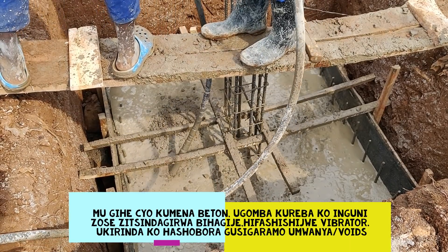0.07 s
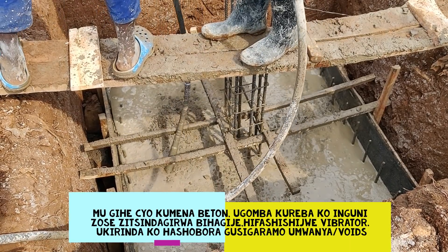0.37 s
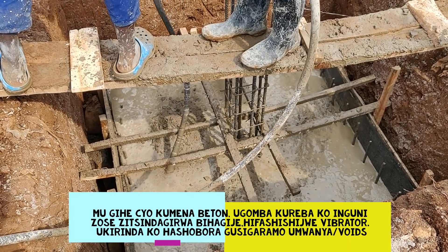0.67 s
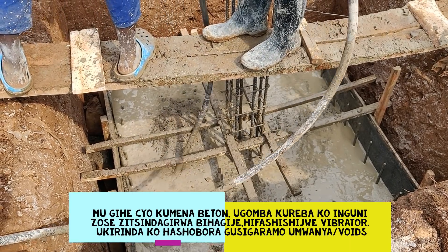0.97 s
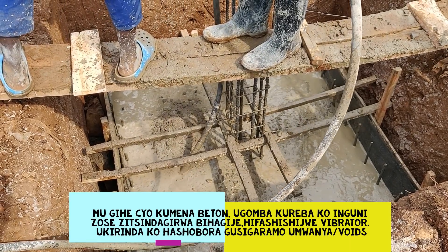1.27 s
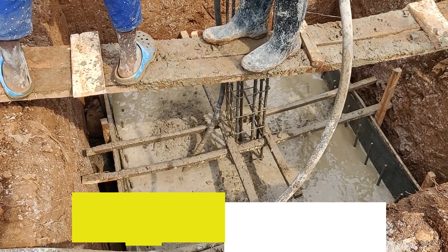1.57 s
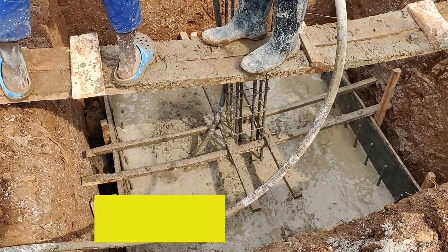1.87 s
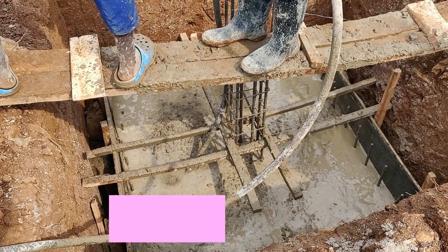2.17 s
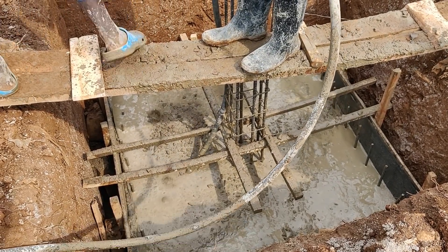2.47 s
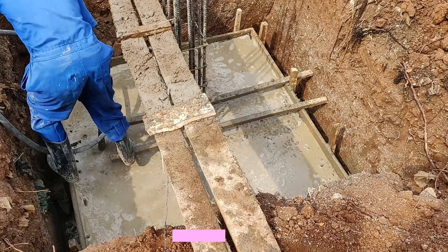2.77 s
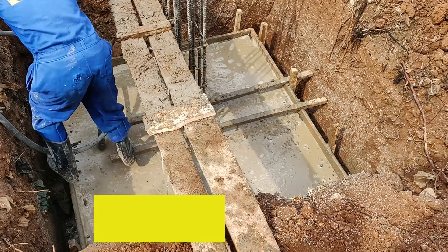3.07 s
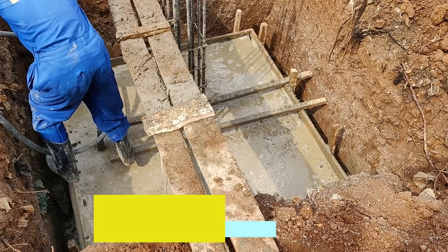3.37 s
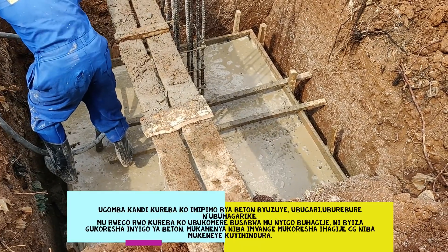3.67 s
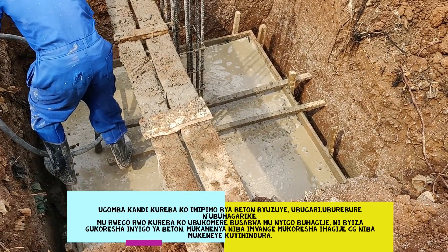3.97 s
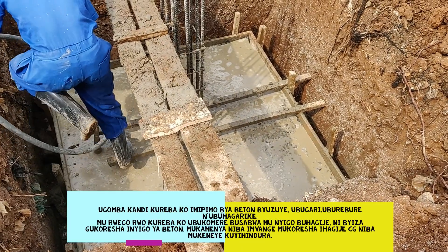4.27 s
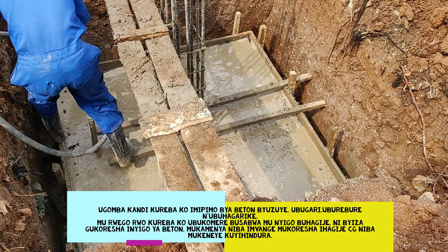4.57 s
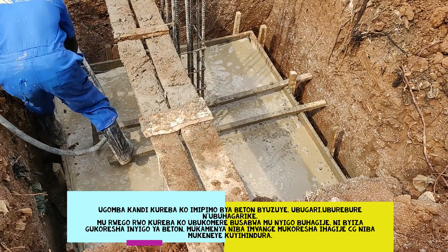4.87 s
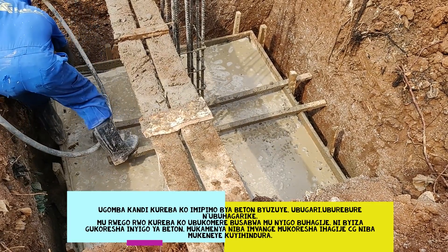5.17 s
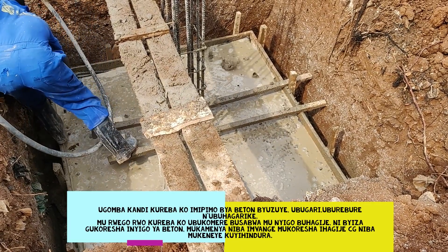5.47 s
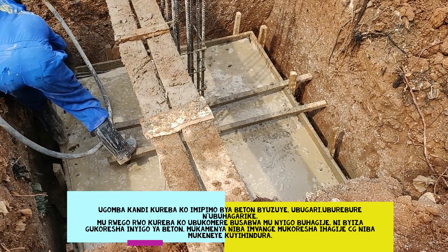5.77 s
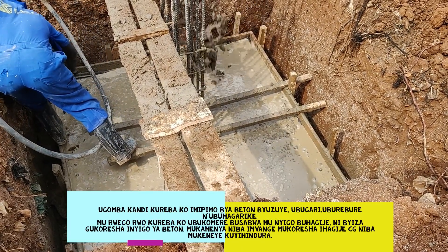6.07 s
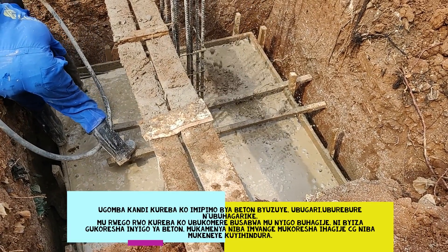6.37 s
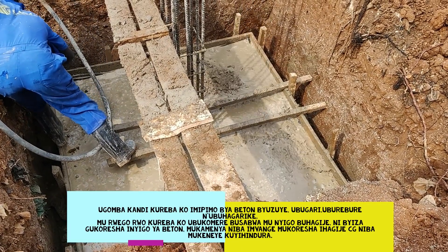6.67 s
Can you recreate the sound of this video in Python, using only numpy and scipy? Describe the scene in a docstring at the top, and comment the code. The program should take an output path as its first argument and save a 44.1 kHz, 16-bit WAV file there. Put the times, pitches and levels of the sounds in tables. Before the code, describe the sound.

A petrol-driven poker vibrator shakes wet concrete at an outdoor building site. Its hum pulses unevenly, with a shrill metallic rattle on top and a small engine throbbing behind. The sound dips for an instant and returns from another spot, where gusts of wind rumble on the microphone. Near the end a lump of concrete plops into the mix and spatters while the machine keeps running.

```python
"""A petrol-driven poker vibrator shakes the wet concrete of a footing, heard from two spots in turn.
From the start it hums, beating against a slightly slower second poker. Its pendulum rattles round the
casing, the small engine throbs behind it, and wet grit sprays now and then.
At 2.65 s the sound dips briefly and returns at the second spot, where wind ruffles the microphone.
Near 6 s a lump of concrete plops into the mix and spatters."""
import sys
import numpy as np
from scipy import signal
from scipy.fft import rfft, irfft
from scipy.io import wavfile

SR = 44100
rng = np.random.default_rng(int(sys.argv[2]) if len(sys.argv) > 2 else 0)


def unload_audio(sound):
    """Save the sound as a 16-bit wav file, at the path given as the first command line argument."""
    columns = np.transpose(np.atleast_2d(sound))
    # keep every value between -1 and 1, then stretch to whole-number steps
    steps = np.round(np.clip(columns, -1, 1) * 32767)
    wavfile.write(sys.argv[1], SR, steps.astype(np.int16))


N = 296352
T = np.arange(N) / SR
HZ = np.fft.rfftfreq(N, 1 / SR)


def amp(db):
    """Turns decibels into a number to multiply by."""
    return 10 ** (np.asarray(db) / 20)


def unit(x):
    """Scales a signal so its average power is 1."""
    return x / np.sqrt(np.mean(x ** 2) + 1e-20)


def curves(rows):
    """Joins the points of a time table: one curve per value column."""
    times, *columns = np.transpose(rows)
    return np.array([np.interp(T, times, c) for c in columns])


def spectra(rows):
    """Joins the points of a pitch table: one curve per value column."""
    hz, *columns = np.transpose(rows)
    return np.array([np.interp(np.log(HZ + 1), np.log(hz + 1), c) for c in columns])


def drift(per_s):
    """A random wobble, with up to about per_s changes a second."""
    return unit(irfft(rfft(rng.standard_normal(N)) * np.exp(-(HZ / per_s) ** 2), N))


def hump(middle_s, length_s):
    """A smooth swell up to 1 and back down."""
    return np.exp(-(2 * (T - middle_s) / length_s) ** 2)


def tone(turns):
    """A pure tone, one wave per turn, starting anywhere in its wave."""
    return np.sqrt(2) * np.sin(2 * np.pi * (turns + rng.random()))


# How alike left and right sound, from 0 to 1: pitch_hz, first_spot_likeness, second_spot_likeness
MIC_LIKENESS = [(100, 0, 0.39), (296, 0.38, 0.4), (550, .6, 0.41), (750, 0.57, 0.51), (1206, 0.68, 0.87),
                (2120, 0.73, 0.34), (2740, 0.3, 0.21), (5500, 0.37, 0.18), (7000, 0.18, 0.22),
                (9500, 0, .1)]
# How far the right side lags, its path being longer: pitch_hz, first_spot_radians, second_spot_radians
RIGHT_LAG = [(260, 0, 0), (700, 2, 1.2), (1000, 2.6, 1.5), (1280, 3.3, 3), (2000, 6, 4), (2700, 8.5, 9.6),
             (3500, 9.8, 10), (4600, 13.7, 16), (5600, 14.1, 16.5), (6300, 12, 19.3), (9000, 14, 24)]
def stereo_noise(spot, gain):
    """Noise as the microphone's two sides hear it. Spot 0 is the first spot, 1 the second."""
    left, other = rfft(rng.standard_normal((2, N))) * np.sqrt(SR / 2)
    same = np.clip(spectra(MIC_LIKENESS)[spot], 0, 1)
    right = (same * left + np.sqrt(1 - same ** 2) * other) * np.exp(-1j * spectra(RIGHT_LAG)[spot])
    return irfft(np.array([left, right]) * gain, N)


# Gusts on the microphone: middle_s, length_s, left_db, right_db
GUSTS = [(2.77, 0.082, -13.5, -21), (3.034, 0.36, -18, -26), (3.227, .16, -27, -23),
         (3.38, 0.089, -18, -31), (3.721, 0.3, -18.5, -22), (3.995, 0.31, -20, -17),
         (4.29, 0.19, -19, -16.5), (4.555, 0.31, -22, -16.5), (4.721, 0.11, -16.5, -18),
         (4.863, .13, -19, -16.5), (5.06, 0.097, -21, -24), (5.615, 0.069, -19.5, -33),
         (5.75, 0.11, -22, -31), (6.2, 0.21, -25, -35), (6.547, 0.19, -22.5, -31), (6.693, 0.088, -26, -32)]
# The wind's deep rumble: pitch_hz, relative_db
RUMBLE_COLOUR = [(8, -13), (20, 2), (38, 1.5), (70, -4.5), (130, -10.5), (250, -22), (450, -25.5),
                 (1000, -70)]
# The higher flutter of strong gusts: pitch_hz, relative_db
FLUTTER_COLOUR = [(80, 6.5), (240, 3.5), (400, -5), (600, -11.5), (1200, -56)]
# Single thumps of air: middle_s, pitch_hz, relative_db, length_s
AIR_THUMPS = [(2.71, 85, -15, .055), (2.785, 95, -21, .035)]
def wind(breeze_db=(-33, -28), lump_db=0.3, flutter_db=2, flutter_growth=1.4):
    """Gusts rumble on each side of the microphone; as they swell, flutter grows faster than rumble."""
    power = amp(breeze_db)[:, None] ** 2
    power = power + sum(amp(db)[:, None] ** 2 * hump(s, length) for s, length, *db in GUSTS)
    level_db = 10 * np.log10(power)
    rumble, flutter = (unit(irfft(rfft(rng.standard_normal((2, N))) * amp(spectra(colour)), N))
                       for colour in (RUMBLE_COLOUR, FLUTTER_COLOUR))
    lumps = unit(amp(lump_db * np.array([drift(10.5), drift(25)])))
    out = lumps * (rumble * amp(level_db) + flutter * amp(flutter_db + flutter_growth * level_db))
    mostly_left = np.array([[2], [.5]])
    for s, hz, db, length in AIR_THUMPS:
        out += amp(db) * hump(s, length) * np.sin(2 * np.pi * hz * (T - s)) * mostly_left
    return out


# Sprays of wet grit: start_s, level_db, length_s
SPRAYS = [(0.22, -26, .05), (1.668, -30, 0.052), (1.972, -24, 0.021), (4.202, -23, 0.0076),
          (5.34, -34, 0.065), (5.648, -36, 0.015), (5.944, -19, 0.013), (5.959, -23.5, 0.05),
          (6.001, -26, 0.068), (6.062, -30.5, .06), (6.166, -28, 0.034), (6.19, -20, 0.01),
          (6.4, -32.5, 0.14)]
# How bright the sprays sound: pitch_hz, left_relative_db, right_relative_db
SPRAY_COLOUR = [(506, -13, -29), (1500, -3, -11), (3000, -5, -3.5), (6140, 4.5, -4), (8750, -20, 3.5),
                (10200, -47, -11), (15500, -20, -13)]
def spatter(drops_per_s=7000, spread_db=-2.5, rise_s=0.0013):
    """Each spray of grit is a dying shower of tiny clicks, some big and some small."""
    shower = np.zeros(N)
    for s, db, length in SPRAYS:
        age = np.maximum(T - s, 0)
        shower += amp(db) * (1 - np.exp(-age / rise_s)) * np.exp(-np.minimum(age / length, 6) ** 2)
    sizes = amp(spread_db * np.minimum(rng.exponential(1, N), 3))
    lands = rng.random(N) < drops_per_s / SR
    clicks = unit(sizes * lands * rng.standard_normal((2, N)))
    return irfft(rfft(clicks * shower) * unit(amp(spectra(SPRAY_COLOUR))), N)


# Air pockets popping: start_s, pitch_hz, level_db, fade_s (time to fall by 60 dB)
AIR_POCKETS = [(5.9451, 1194, -10.5, 0.033), (5.946, 1030, -16, 0.026), (5.9465, 725, -7, 0.022),
               (5.945, 2200, -17, 0.022), (5.946, 4000, -19.5, 0.013), (5.945, 86, -14.5, 0.13)]
def plop(rise_s=0.00042, right_delay_s=0.00016):
    """A lump lands and air pockets pop in quick turn, each ringing as a short, dying tone."""
    out = np.zeros((2, N))
    samples = SR // 8
    age = np.maximum(np.arange(samples) / SR - np.array([[0], [right_delay_s]]), 0)
    for s, hz, db, fade_s in AIR_POCKETS:
        start = round(s * SR)
        loudness = amp(db) * 1000 ** (-age / fade_s) * (1 - np.exp(-age / rise_s))
        out[:, start:start + samples] += loudness * np.sin(2 * np.pi * hz * age)
    return out


# The engine's tones: multiple_of_firing_rate, first_spot_db, second_spot_db
ENGINE_TONES = [(1, -44, -49), (2, -30, -37), (3, -39, -43), (4, -40, -40), (5, -33, -35), (6, -33, -35),
                (7, -55, -51), (8, -35, -44), (9, -40, -58), (10, -39, -49), (11, -35.5, -54),
                (13, -43, -65), (16, -43.5, -50)]
# Roar of exhaust and casing, before its top is cut: pitch_hz, first_spot_db_per_hz, second_spot_db_per_hz
ENGINE_ROAR = [(30, -57, -57), (110, -59, -54), (200, -56, -53), (330, -54, -59), (470, -54.5, -60),
               (640, -57, -60), (770, -57, -58.5), (880, -60, -62.5), (1150, -61, -60.5),
               (1350, -60.5, -59.5), (1550, -60, -65), (1800, -63, -65), (2200, -63, -69), (3000, -66, -71)]
def engine(spot, firings, unevenness=0.15, throb_db=0.5, flicker_db=0.5, cutoff_hz=3000):
    """The engine's firings blend into low tones, and its roar swells with each one."""
    tones = sum(amp(db[spot]) * tone(round(multiple) * firings) * (1 + unevenness * drift(6.9))
                for multiple, *db in ENGINE_TONES)
    roar = stereo_noise(spot, amp(spectra(ENGINE_ROAR)[spot]) / (1 + (HZ / cutoff_hz) ** 12))
    swell_db = throb_db * (tone(firings) + 0.26 * tone(2 * firings)) + flicker_db * drift(21)
    return tones + roar * unit(amp(swell_db))


# Narrow ringing bands: pitch_hz, width_hz, first_spot_db, second_spot_db
RINGING_BANDS = [(460, 10, -41, -47), (770, 50, -43, -44), (997, 10, -45, -45), (1120, 50, -50, -43),
                 (1305, 50, -58, -42), (1385, 40, -45, -44), (9400, 70, -62, -48), (15490, 110, -72, -58)]
def rings(spot):
    """Narrow ringing bands of noise, plus a faint, very high whistle."""
    power = sum(amp(db[spot]) ** 2 * np.exp(-np.pi * ((HZ - hz) / width) ** 2) / width
                for hz, width, *db in RINGING_BANDS)
    return stereo_noise(spot, np.sqrt(power))


# The hose's shrill ring, one list per spot: time_s, pitch_hz, level_db
SHRILL_GLIDE = ([(0, 5800, -36), (.5, 5740, -27.5), (1.2, 5320, -31.5), (2.6, 5180, -32.5)],
                [(2.7, 5570, -45), (3.4, 5370, -32), (4.55, 5620, -33), (5.25, 5400, -49), (5.6, 5270, -33),
                (6.1, 5280, -30.5), (6.7, 5400, -46)])
def shrill_ring(spot, width_hz=240, right_db=-8.0):
    """A narrow band of grinding noise from the hose slides in pitch as the poker is moved."""
    hz, level_db = curves(SHRILL_GLIDE[spot])
    angle = 2 * np.pi * np.cumsum(hz) / SR
    sides = [drift(width_hz) * np.cos(angle) + drift(width_hz) * np.sin(angle) for _ in range(2)]
    return np.array(sides) * amp(level_db) * amp([[0], [right_db]])


# The colour of the rattle's hiss at a reference level, one list per spot:
# pitch_hz, left_db_per_hz, right_db_per_hz
RATTLE_COLOUR = ([(1950, -77, -79), (2880, -64, -67), (3730, -61, -62.5), (4630, -60, -59),
                 (5320, -55, -56), (5950, -52.5, -68), (6130, -57, -51), (6310, -51, -63.5),
                 (7080, -62, -62.5), (8600, -73, -58.5), (9250, -79, -62), (10100, -77, -76.5),
                 (10100, -100, -87.5), (15000, -83, -77.5)], [(2000, -78, -105), (2970, -64, -66.5),
                 (3530, -60.5, -63), (4120, -61.5, -62), (5200, -53, -57.5), (5800, -51, -51),
                 (5700, -50.5, -62.5), (6410, -50.5, -66), (7170, -61.5, -58.5), (8530, -81, -58),
                 (9750, -104, -64.5), (10000, -102, -78.5), (15500, -102, -78.5)])
# How strong that hiss is, one list per spot: time_s, level_db (counted against reference_db)
RATTLE_STRENGTH = ([(0, -22.5), (.7, -26), (.82, -24.5), (1.45, -26), (2.4, -25.5), (2.6, -27)],
                   [(2.7, -37.5), (3.5, -37), (4.8, -36), (5.2, -37.5), (5.6, -37), (6.7, -36.5)])
# The head scrapes on steel and the hiss swells: middle_s, rise_db, length_s
SCRAPES = [(3.415, 7.5, 0.019), (4.54, 3, 0.12)]
def rattle(spot, whirls, shaft_turns, roll_db=0.26, shaft_db=0.4, whirl_db=0.4, grit_db=0.9,
           flicker_db=0.6, roll_hum_db=(-35, -42), reference_db=(-23.3, -29.0)):
    """The pendulum hums and grinds round its track, once per whirl plus once per shaft turn."""
    level_db = curves(RATTLE_STRENGTH[spot])[0] + sum(db * hump(s, length) for s, db, length in SCRAPES)
    roll = tone(whirls + shaft_turns)
    contact_db = roll_db * roll + shaft_db * tone(shaft_turns)
    contact_db += whirl_db * (tone(whirls) + tone(2 * whirls))
    contact_db += grit_db * drift(700) + flicker_db * drift(22)
    hiss = stereo_noise(spot, amp(spectra(RATTLE_COLOUR[spot]))) * amp(level_db - reference_db[spot])
    grinding = (hiss + shrill_ring(spot)) * unit(amp(contact_db))
    return grinding + amp(roll_hum_db[spot]) * roll


# Beats, the dips in the hum: middle_s, depth_db, slip_length_s
BEATS = [(0.048, -6, 0.034), (0.164, -3.5, 0.094), (0.39, -10, 0.044), (0.575, -16, 0.062),
         (0.786, -10, 0.043), (1.084, -9.5, .2), (1.37, -5, 0.13), (1.67, -7.5, 0.14), (1.95, -8, 0.16),
         (2.231, -3, 0.098), (2.74, -13, 0.17), (3.028, -12, 0.17), (3.307, -19, 0.074),
         (3.533, -23, 0.097), (3.88, -12.5, 0.14), (4.296, -3.5, 0.1), (4.502, -2.5, .08)]
def beating():
    """The pokers pull each other into step; then the slower one slips a turn and the hums partly cancel."""
    times, depth_db, _ = np.transpose(BEATS)
    lag_turns = sum(np.arctan(np.sinh(np.clip(2 * (T - s) / length, -20, 20))) / np.pi + .5
                    for s, _, length in BEATS)  # one smooth step per beat
    slower_share = np.interp(T, times, np.clip((1 - amp(depth_db)) / 2, 0, .5))
    return 1 - slower_share + slower_share * np.exp(-2j * np.pi * lag_turns)


# How hard the pokers shake the mix when in step, one list per spot: time_s, level_db
HUM_LEVEL = ([(0, -11.5), (.5, -9.5), (.85, -9), (1.8, -11), (2.15, -12), (2.6, -12)], [(2.7, -16),
             (3.45, -12), (4.05, -14.5), (4.35, -18.5), (5.2, -13), (6.7, -13.7)])
# Stones and steel press on the head and set its overtones, one list per spot: time_s, level_db
HEAD_LOAD = ([(0.05, -32), (.16, -24.5), (.5, -27), (.75, -35.5), (.86, -27), (1.05, -32.5), (1.18, -27),
             (1.85, -23.5), (2.1, -34), (2.35, -30.5), (2.6, -28)], [(2.7, -36.5), (4.7, -35), (5.4, -40),
             (6.7, -39.5)])
# Higher tones of the hum, added to that level: multiple_of_hum_pitch, first_spot_db, second_spot_db
OVERTONES = [(2, 1.5, -1), (3, -12.5, -3), (4, -22, -8), (6, -30, -11.5)]
def poker(spot, whirls, flutter=0.076, overtone_flutter=0.34, jitter_turns=0.022, overtone_growth=0.88):
    """Two whirling heads hum and beat; stones in the mix jostle their overtones, the high ones most."""
    pair = beating()
    strength, shift_turns = abs(pair), np.angle(pair) / (2 * np.pi)
    hum = amp(curves(HUM_LEVEL[spot])[0]) * strength * tone(whirls + shift_turns)
    hum *= 1 + flutter * drift(35)
    load = amp(curves(HEAD_LOAD[spot])[0]) * strength ** overtone_growth
    for multiple, *db in OVERTONES:
        turns = round(multiple) * whirls + (multiple - 1) * jitter_turns * drift(21)
        hum += load * amp(db[spot]) * tone(turns) * (1 + overtone_flutter * drift(16))
    return hum * amp([[.2], [-.2]])  # a touch louder on the left


# How fast the poker whirls, one list per spot: time_s, pitch_hz
POKER_SPEED = ([(0, 183.3), (.35, 182.3), (.68, 178.9), (.85, 182.8), (1.15, 181.1), (1.36, 184),
               (1.56, 180.9), (2.3, 184.4), (2.6, 179.8)], [(2.7, 182.5), (3.15, 182.5), (3.65, 183),
               (3.95, 183.8), (4.45, 182.8), (5.2, 184.4), (5.85, 183), (6.05, 185.6), (6.4, 183.6)])
def machine(spot, firings_per_s=(28.5, 28.57), speed_wander=0.0028):
    """A four-stroke engine turns the bendy shaft twice per firing, and the shaft drives the poker."""
    firings = np.cumsum(firings_per_s[spot] * (1 + speed_wander * drift(3.4))) / SR
    whirls = np.cumsum(curves(POKER_SPEED[spot])[0]) / SR
    return poker(spot, whirls) + engine(spot, firings) + rings(spot) + rattle(spot, whirls, 2 * firings)


def scene(move_s=2.65, fade_s=0.033):
    """The first spot, a brief dip to silence, then the windy second spot."""
    before = np.clip((move_s - T) / fade_s, 0, 1) ** 2
    after = np.clip((T - move_s) / fade_s, 0, 1) ** 2
    return before * machine(0) + after * (machine(1) + wind()) + plop() + spatter()


def record(dry, ceiling=.93, cutoff_hz=15850):
    """Rounds off the tallest peaks, then cuts the very highest pitches."""
    rounded = dry / (1 + (dry / ceiling) ** 10) ** (1 / 10)
    low_pass = signal.firwin(801, cutoff_hz, window=("kaiser", 9), fs=SR)
    return signal.oaconvolve(rounded, low_pass[None], "same")


dry = scene()
out = record(dry)
unload_audio(out)
```